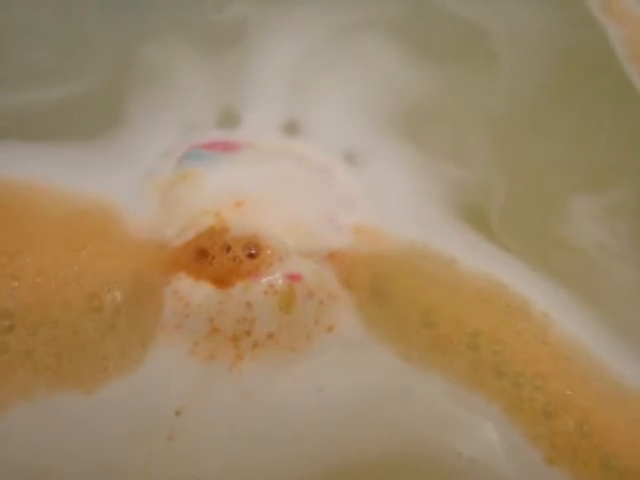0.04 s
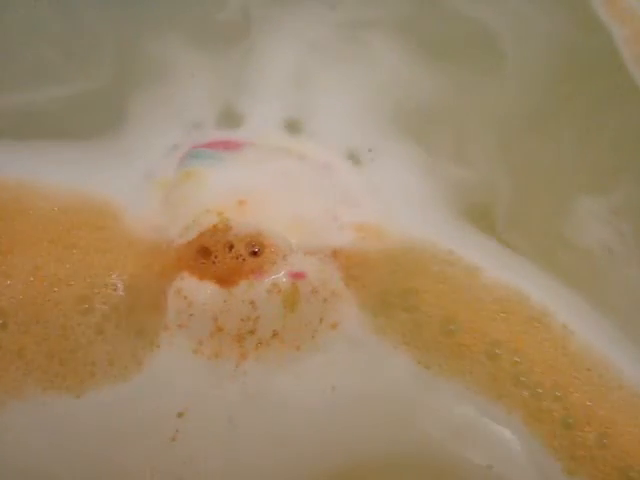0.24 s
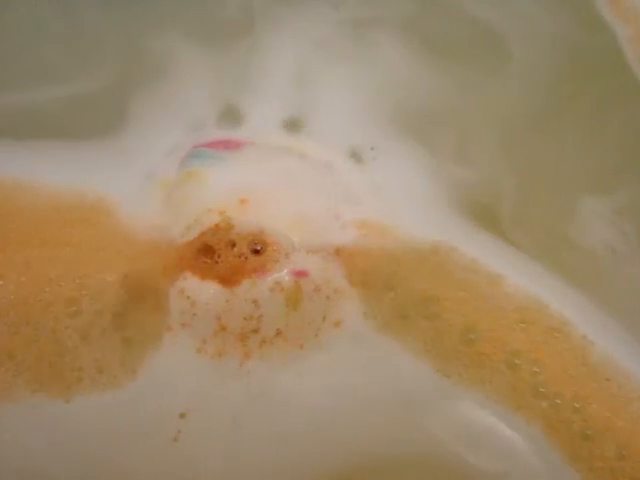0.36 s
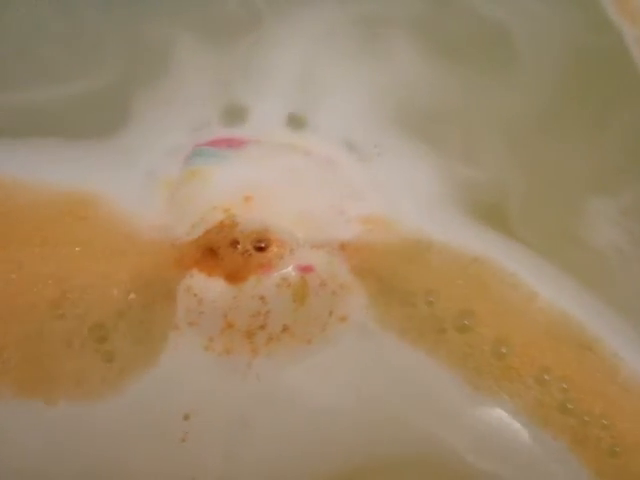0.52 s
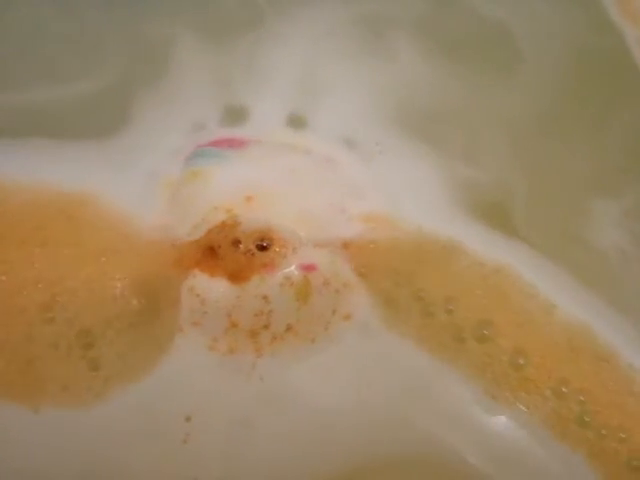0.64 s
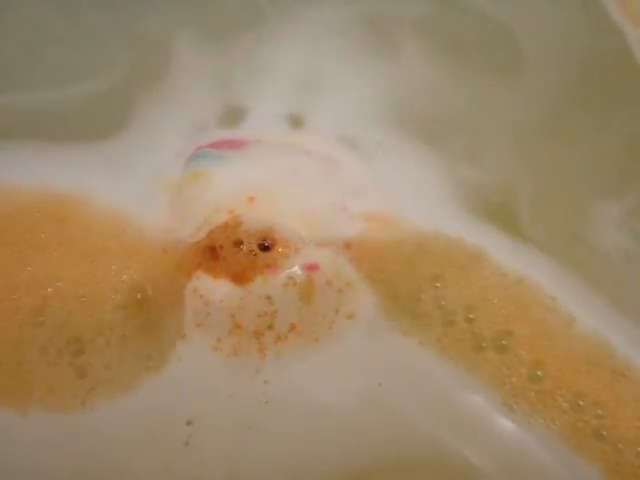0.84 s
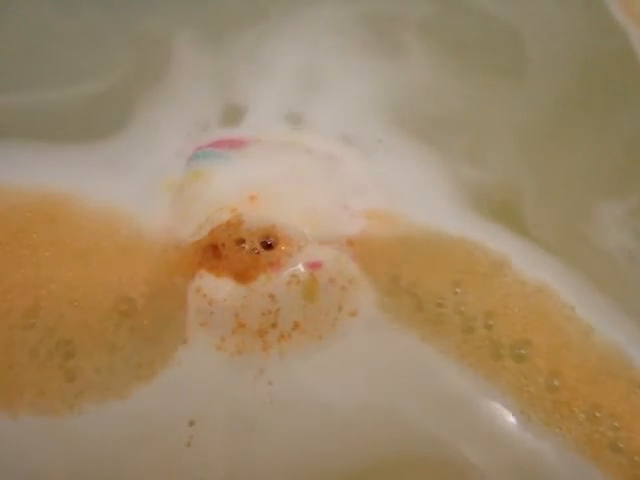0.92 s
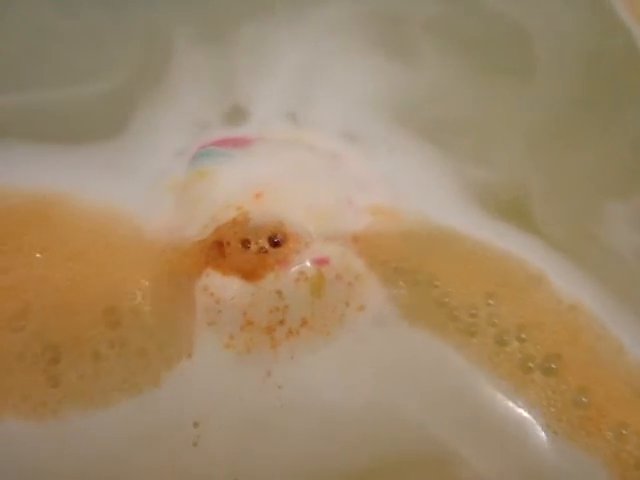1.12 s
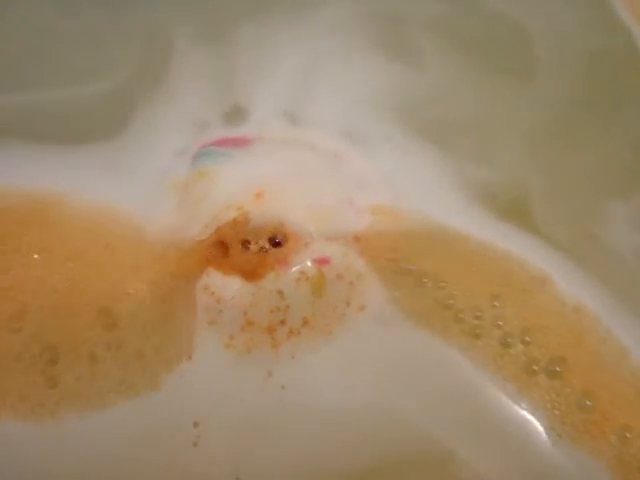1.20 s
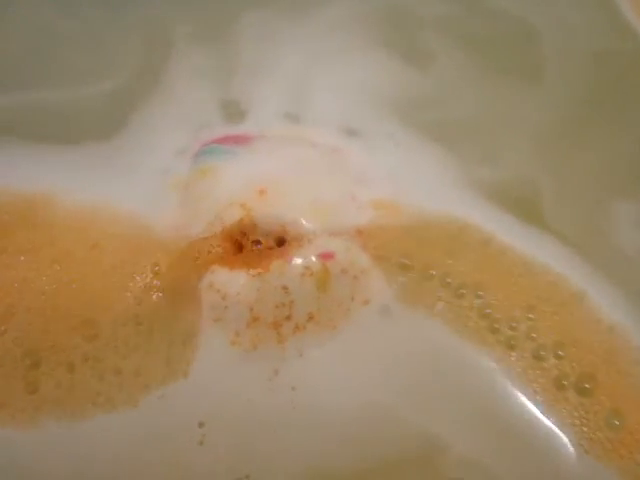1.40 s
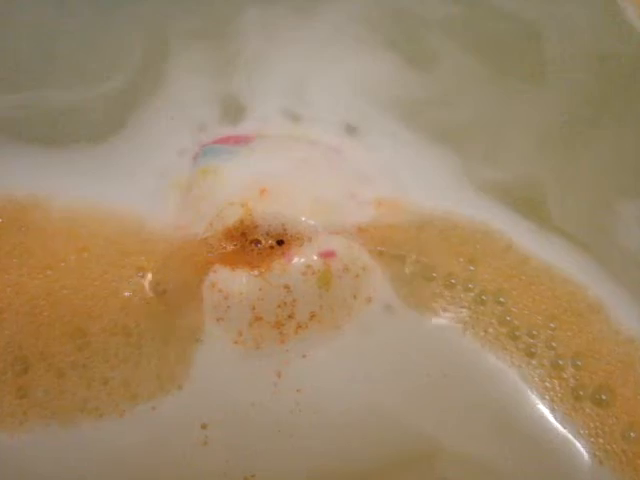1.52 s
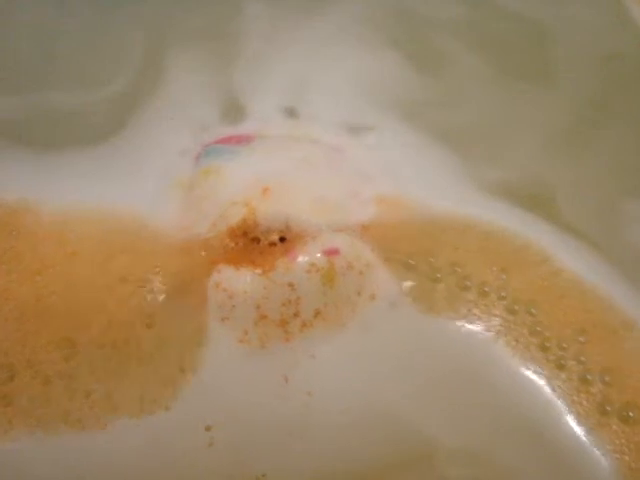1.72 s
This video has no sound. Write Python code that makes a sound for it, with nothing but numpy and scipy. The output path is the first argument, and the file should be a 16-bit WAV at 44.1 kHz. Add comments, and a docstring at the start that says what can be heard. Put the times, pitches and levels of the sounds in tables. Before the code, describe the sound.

Close, mono fizzing of a dissolving bath bomb over faint room noise. A single loud, bright snap soon rings off the tub walls and fades, followed by continued fizz with sparse tiny bubble ticks.

```python
"""Bath bomb fizz with one sharp tap

Thousands of tiny bubbles burst each second, as short damped sines over coloured hiss and a soft, steady
room noise. One sharp tap, probably a larger bubble snapping, rings as a bank of damped sines, bounces off
the tub walls and dies away in the bathroom as enveloped noise. Both channels carry the same sound."""
import sys
import numpy as np
from scipy import signal
from scipy.fft import rfft, irfft, next_fast_len
from scipy.io import wavfile

SR = 44100
rng = np.random.default_rng(int(sys.argv[2]) if len(sys.argv) > 2 else 0)


def unload_audio(sound):
    """Save the sound as a 16-bit wav file, at the path given as the first command line argument."""
    columns = np.transpose(np.atleast_2d(sound))
    # keep every value between -1 and 1, then stretch to whole-number steps
    steps = np.round(np.clip(columns, -1, 1) * 32767)
    wavfile.write(sys.argv[1], SR, steps.astype(np.int16))


N = 77175  # samples, 1.75 s

TAP_S = 0.2392  # onset of the tap
# colour of the fizz, shared by hiss and crackle: frequency_hz, relative level_db (per Hz)
FIZZ_COLOUR = [(300, -26), (1000, -8), (1900, -5), (2350, 0.5), (3050, -3), (3450, 1.5), (4100, 0),
               (5300, 1), (6400, 0.5), (7300, -1), (9200, 0.5), (10000, -3.5)]


def amp(db):
    """Decibels to gain."""
    return 10 ** (np.asarray(db) / 20)


def unit(x):
    """Scale a signal to rms 1."""
    return x / np.sqrt(np.mean(x ** 2) + 1e-20)


def filtered(x, response):
    """Multiply the spectrum of x by a response of frequency, with zero padding against wrap-around."""
    size = next_fast_len(N + SR // 2)
    spectrum = rfft(x, size) * response(np.fft.rfftfreq(size, 1 / SR))
    return irfft(spectrum, size)[..., :N]


def coloured(x, points):
    """Shape x by (frequency_hz, level_db) points joined on a log-frequency axis, at rms 1."""
    point_hz, point_db = np.transpose(points)

    def response(hz):
        return amp(np.interp(np.log(hz + 1), np.log(point_hz + 1), point_db))

    return unit(filtered(x, response))


def noise(points):
    """Coloured Gaussian noise of rms 1."""
    return coloured(rng.standard_normal(N), points)


def since(start_s):
    """Seconds elapsed since start_s, zero before it."""
    return np.maximum(np.arange(N) / SR - start_s, 0)


def fade(t, t60):
    """Exponential decay that falls 60 dB in t60 seconds."""
    return np.exp(-np.log(1000) * t / t60)


def ring(t, hz, t60):
    """A damped sine, the sound of one resonance once struck."""
    return np.sin(2 * np.pi * hz * t) * fade(t, t60)


def swell(start_s, rise_s, t60):
    """An envelope that starts at start_s, rises and dies away."""
    t = since(start_s)
    return (1 - np.exp(-t / rise_s)) * fade(t, t60)


def room_noise():
    """Steady background noise of the room, strongest in the low mids."""
    # room spectrum: frequency_hz, relative level_db (per Hz)
    room_colour = [(25, -20.5), (55, -15), (90, -13), (135, -5.5), (230, -0.5), (400, 0), (600, -0.5),
                   (1000, -2.3), (1500, -5), (2100, -7.5), (5000, -14.5), (10000, -21)]
    return amp(-56.5) * noise(room_colour)  # dB rms


def reverb_wash():
    """The bathroom's broad reverberation: dense reflections of the tap, heard as decaying noise."""
    # reverberation spectrum: frequency_hz, relative level_db (per Hz)
    wash_colour = [(200, -35), (600, -12), (1200, -1), (1900, -5), (2400, 2), (3400, 0), (4300, 4),
                   (5500, -3), (7000, -6), (8000, -16), (10000, -22)]
    envelope = swell(TAP_S, rise_s=0.018, t60=0.5)
    return amp(-47.5) * noise(wash_colour) * envelope


def bloom():
    """A bright hiss, narrow in pitch, that swells just after the tap and fades."""
    # bloom spectrum: frequency_hz, relative level_db (per Hz)
    bloom_colour = [(1000, -30), (2500, -21), (3700, -17), (4400, -6), (4900, 0), (5400, 1), (6000, -5),
                    (6900, -15), (8000, -24), (10000, -32)]
    delay_s = 0.034
    envelope = swell(TAP_S + delay_s, rise_s=0.013, t60=0.245)
    return amp(-38.3) * noise(bloom_colour) * envelope


def spray():
    """A short spray of noise behind the tap, with a quick rise and an exponential fade."""
    # spray spectrum: frequency_hz, relative level_db (per Hz)
    spray_colour = [(1000, -16), (1900, -12), (2400, 3), (3000, -4), (3750, -4), (4200, 9), (4650, -1),
                    (5200, -20), (6000, -15), (6700, -2), (7400, -17), (10000, -26)]
    envelope = swell(TAP_S, rise_s=0.006, t60=0.2)
    return amp(-41) * noise(spray_colour) * envelope


def bubble_bursts():
    """Tiny bubbles burst at random moments, each a few cycles long at its own pitch and size."""
    bursts_per_s, centre_hz, decay_cycles = 2800, 7620, 6.4
    pitch_spread = 0.36  # on a natural-log scale
    size_spread_db = 4.5
    count = int(bursts_per_s * N / SR)
    draws = rng.standard_normal((count, 4))
    # the angle of two Gaussian draws is uniform: an even chance of any moment
    place = np.arctan2(draws[:, :1], draws[:, 1:2]) / (2 * np.pi) % 1
    hz = np.clip(centre_hz * np.exp(pitch_spread * draws[:, 2:3]), 1000, SR / 3)
    size = amp(size_spread_db * np.minimum(draws[:, 3:], 2.5))  # caps the largest bubbles
    k = np.arange(256)  # samples in one grain
    grains = size * ring(k / SR, hz, decay_cycles / hz)
    positions = (place * N).astype(int) + k
    return np.bincount(positions.ravel(), grains.ravel(), N)[:N]


def fizz():
    """Near bubbles crackle one by one; the farther ones merge into hiss."""
    # how hard the bomb fizzes: time_s, level_db
    vigour_points = [(.1, -.4), (.6, -.2), (.8, .7), (1.05, .6), (1.7, 0)]
    hiss = amp(-58) * noise(FIZZ_COLOUR)
    crackle = amp(-63.3) * coloured(bubble_bursts(), FIZZ_COLOUR)
    vigour = amp(np.interp(np.arange(N) / SR, *np.transpose(vigour_points)))
    return vigour * (hiss + crackle)


def pops():
    """A few bigger bubbles tick above the fizz, each a damped sine."""
    # bubbles that stand out: start_s, pitch_hz, level_db
    big_bubbles = [(0.578, 6000, -47), (.6873, 4500, -43), (0.6932, 8500, -37.5), (.7076, 6400, -41.5),
                   (0.7413, 5100, -41.5), (.9640, 5700, -40), (.9880, 6000, -47), (1.2770, 6500, -49)]
    decay_cycles = 13  # cycles to fall 60 dB
    return sum(amp(db) * ring(since(start_s), hz, decay_cycles / hz) for start_s, hz, db in big_bubbles)


def droplet_ticks():
    """Small ticks just after the tap, probably droplets landing, each a damped sine."""
    # ticks: start_s, pitch_hz, level_db (before the tap's band filter)
    droplets = [(.2519, 3200, -34.5), (.2543, 6300, -37), (.2550, 4300, -37), (.2627, 4200, -41),
                (.2712, 4200, -38), (.2788, 4900, -38)]
    return sum(amp(db) * ring(since(start_s), hz, t60=0.012) for start_s, hz, db in droplets)


def snap(start_s):
    """One crack and the short ring of many resonances that builds up behind it."""
    # what the tap rings with: pitch_hz, relative level_db, t60_s
    tap_modes = [(1466, -11.5, .025), (1780, -14, .021), (2284, -12, .016), (2506, -10.5, .017),
                 (3099, -18, .0074), (3412, -7.3, .0116), (3743, -14, .017), (4069, -3.4, .0112),
                 (4602, -9, .0105), (4889, -2.5, .0144), (5249, 1, .0104), (5937, -7.6, .014),
                 (6157, -5.8, .0093), (6609, -4, .0082), (6987, -12, .0078), (7531, -11, .007)]
    crack_hz, crack_cycles = 4350, 9.4
    ring_rise_s = 0.0004
    t = since(start_s)
    modes = sum(amp(db) * ring(t, hz, t60) for hz, db, t60 in tap_modes)
    modes = modes * (1 - np.exp(-t / ring_rise_s))
    crack = ring(t, crack_hz, crack_cycles / crack_hz)
    return amp(-17.2) * modes + amp(-12.5) * crack


def tap():
    """A lead-in tick, the tap, its tub-wall echoes and droplet ticks, thin since a small source lacks bass."""
    # tub wall echoes: delay_s, level_db (relative to the direct tap)
    wall_echoes = [(.0026, -14), (.0048, -20)]
    lead_s = 0.0021  # the tick comes this long before the tap
    lead_in = amp(-22) * snap(TAP_S - lead_s)
    echoes = sum(amp(db) * snap(TAP_S + delay_s) for delay_s, db in wall_echoes)
    heard = lead_in + snap(TAP_S) + echoes + droplet_ticks()
    low_hz, high_hz = 1980, 8220
    band = signal.butter(4, [low_hz, high_hz], "bandpass", fs=SR, output="sos")
    return signal.sosfilt(band, heard)


def scene():
    """Everything reaches one microphone, feeding both channels alike."""
    tail = reverb_wash() + bloom() + spray()
    mono = room_noise() + tail + fizz() + pops() + tap()
    return np.array([mono, mono])


def record(dry):
    """The recorder keeps nothing above its band limit, a steep linear slope in frequency."""
    top_hz, slope_hz = 10080, 160  # middle and width of the slope
    return filtered(dry, lambda hz: np.clip((top_hz - hz) / slope_hz + 0.5, 0, 1))


dry = scene()
out = record(dry)
unload_audio(out)
```